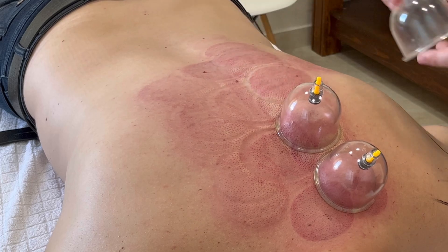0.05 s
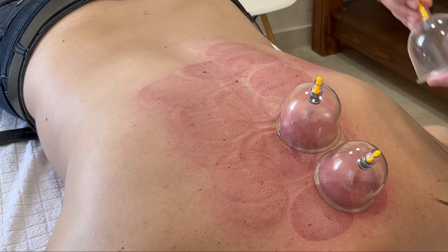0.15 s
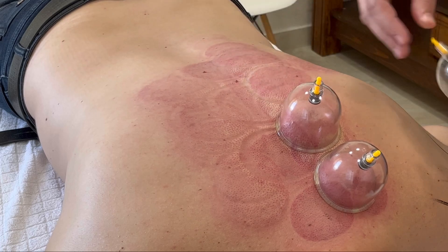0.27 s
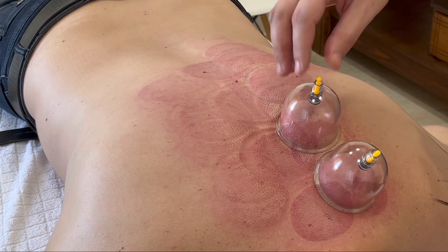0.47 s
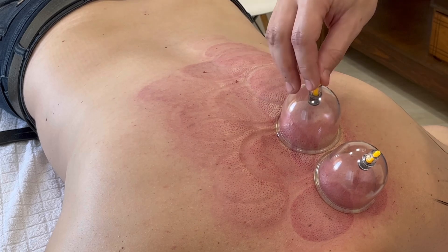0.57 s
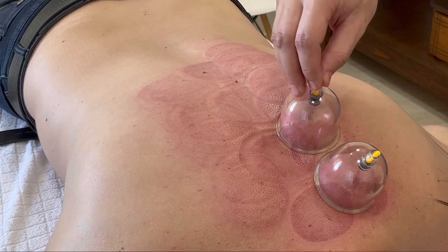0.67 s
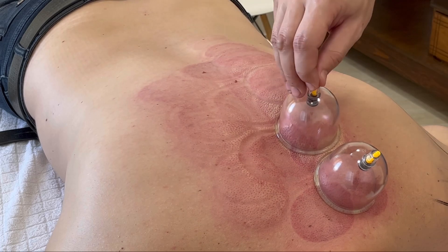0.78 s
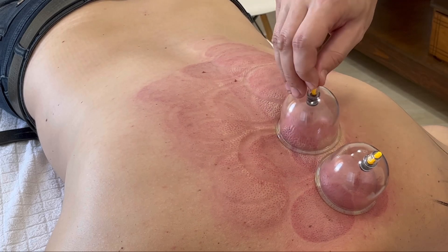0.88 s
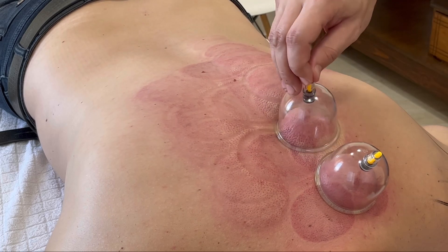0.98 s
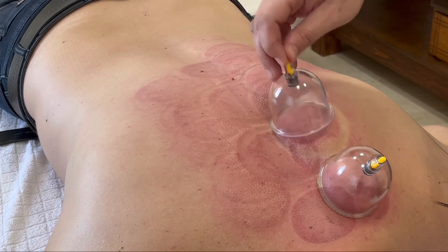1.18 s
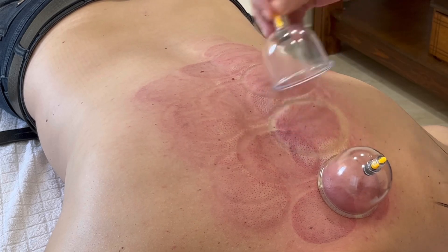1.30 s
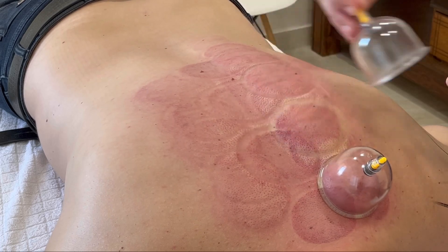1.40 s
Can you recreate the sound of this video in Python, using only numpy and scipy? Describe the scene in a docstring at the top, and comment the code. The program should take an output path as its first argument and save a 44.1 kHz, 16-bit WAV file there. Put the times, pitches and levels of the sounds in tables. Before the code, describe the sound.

A plastic suction cup gives one sharp, hollow pop at about 0.25 seconds, just after a tiny squeak, and rings briefly in a small, hard-walled room. At 0.75 seconds another cup's valve chirps much more quietly, with a short hiss of air and a quick rising note. Light plastic ticks come near 1.1 and 1.4 seconds. A low room rumble and a faint rustle lie underneath.

```python
"""Cupping in a small, hard-walled room.

A freed plastic cup squeaks at the rim and gives one sharp, hollow pop as it is put aside.
Fingers lift the valve of the next cup: it chirps, air hisses in and the cavity's note rises as the
skin sinks back. The cup ticks lightly as it comes off; a low room rumble and a faint rustle lie
underneath."""
import sys
import numpy as np
from scipy import signal
from scipy.fft import rfft, irfft, next_fast_len
from scipy.io import wavfile
from scipy.ndimage import uniform_filter1d

SR = 44100
rng = np.random.default_rng(int(sys.argv[2]) if len(sys.argv) > 2 else 0)


def wrap_up_sound(samples):
    """Save the sound to the file named by the first command line argument, as 16-bit audio."""
    columns = np.atleast_2d(samples).T
    # keep every value between -1 and 1, then stretch to whole-number steps
    tamed = np.clip(columns, -1, 1)
    steps = np.round(tamed * 32767).astype(np.int16)
    wavfile.write(sys.argv[1], SR, steps)


N = 63945


def amp(db):
    """Decibels to gain."""
    return 10 ** (np.asarray(db) / 20)


def unit(x):
    """Scale to rms 1."""
    return x / np.sqrt(np.mean(x ** 2) + 1e-20)


def along(points, hz):
    """Interpolate (f/Hz, value) points on a log axis."""
    f, v = np.transpose(points)
    return np.interp(np.log(hz + 1), np.log(f + 1), v)


def since(s):
    """Seconds since s, zero before."""
    return np.maximum(np.arange(N) / SR - s, 0)


def dying(t, t60):
    """Ring-down starting when t leaves zero."""
    return (t > 0) * np.exp(-np.log(1000) * t / t60)


def swell(s, rise_s, fall_db_per_s):
    """Linear rise, exponential fall."""
    return np.minimum(since(s) / rise_s, 1) * amp(-fall_db_per_s * since(s + rise_s))


def glide(s, from_hz, to_hz, tau_s):
    """Sine whose pitch glides exponentially from time s."""
    pitch_hz = to_hz + (from_hz - to_hz) * np.exp(-since(s) / tau_s)
    return np.sin(2 * np.pi * np.cumsum(pitch_hz) / SR)


def filtered(x, response):
    """Apply a frequency response."""
    size = next_fast_len(N + SR // 2)
    return irfft(rfft(x, size) * response(np.fft.rfftfreq(size, 1 / SR)), size)[..., :N]


def noise(colour):
    """Coloured noise, rms 1."""
    return unit(filtered(rng.standard_normal(N), lambda hz: amp(along(colour, hz))))


def click(s, colour):
    """Minimum-phase coloured click, energy 1."""
    size = 2048
    cepstrum = irfft(np.log(amp(along(colour, np.fft.rfftfreq(size, 1 / SR)))))
    cepstrum[1:size // 2] *= 2
    cepstrum[size // 2 + 1:] = 0
    shape = irfft(np.exp(rfft(cepstrum)))
    return np.pad(shape / np.linalg.norm(shape), (round(s * SR), N))[:N]


# Rim contacts: t/s after POP_S, level/dB
RIM_SNAPS = [(.0002, 4), (.001, 5.5), (.0066, -0.5)]
# Snap spectrum: f/Hz, level/dB
SNAP_SPECTRUM = [(150, -18), (400, -2.5), (630, -14), (950, 9), (1850, 3.5), (2400, 2.5), (2720, -19.5),
                 (3050, 5), (3500, 2.5), (4200, -3), (5500, -7.5), (7500, -2.5), (9800, -2), (11300, -3),
                 (15000, -9.5)]
# Cavity and wall modes: f/Hz, level/dB, t60/s, attack/s
CUP_RESONANCES = [(1202.4, 15, 0.012, 0.0018), (1051, 4, 0.017, 0.0047), (1828, -6, 0.023, 0.0027),
                  (3004, -20, 0.056, 0.00036), (3364, -19, 0.044, 0.00026), (6465, -20.5, 0.044, .0005)]
POP_S, POP_DB, CAVITY_LAG_S = .2492, -16.5, .000886


def pop():
    """The rim snaps, the shell buzzes briefly and the air in the cup rings."""
    snaps = sum(room(amp(db) * click(POP_S + s, SNAP_SPECTRUM), wet_db=-.5) for s, db in RIM_SNAPS)
    t = since(POP_S)
    crack_decay = amp(-12) * dying(t, t60=.0075)
    shell_decay = amp(-17) * dying(t, t60=.11)
    buzz = (crack_decay + shell_decay) * noise(SNAP_SPECTRUM)
    t = since(POP_S + CAVITY_LAG_S)
    ring = 0
    for hz, db, t60, attack_s in CUP_RESONANCES:
        onset = 1 - np.exp(-(t / attack_s) ** 2)
        ring += amp(db) * np.sin(2 * np.pi * hz * t) * dying(t, t60) * onset
    return amp(POP_DB) * (snaps + room(buzz, wet_db=-.5) + room(ring, wet_db=-1.5))


def squeak(start_s=.2184, level_db=-55, roughness=.37):
    """Short, rough, rising rim squeak that swells until the snap."""
    tone = glide(start_s, from_hz=966, to_hz=1660, tau_s=.004)
    flutter = 1 + roughness * unit(uniform_filter1d(rng.standard_normal(N), size=90))
    growth = (since(POP_S) == 0) * since(start_s) / (POP_S - start_s)
    return amp(level_db) * growth * flutter * tone


# Valve chirps: t/s after VALVE_S, length/s, f/Hz, level/dB
VALVE_CHIRPS = [(0, 0.0076, 3026, -42), (.003, 0.0051, 3500, -42), (.008, .007, 2950, -47),
                (0.01, 0.0065, 3560, -44)]
# Inrushing air: f/Hz, level/dB
HISS_SPECTRUM = [(200, -11), (650, -13), (1100, 0), (1450, -7.5), (1820, 1), (2500, -8.5), (3300, 2),
                 (4300, -1), (6100, -6), (6750, -1.5), (7400, -8.5), (9500, -2.5), (11500, 2), (15000, -2),
                 (16000, -6.5)]
VALVE_S, INRUSH_S, NOTE_S = .7455, .751, .755


def valve():
    """The valve chirps, air rushes in and blows a rising note in the cup."""
    chirps = 0
    for s, length_s, hz, db in VALVE_CHIRPS:
        t = since(VALVE_S + s)
        arch = np.sin(np.pi * np.minimum(t / length_s, 1))
        chirps += amp(db) * arch * np.sin(2 * np.pi * hz * t)
    inrush = swell(INRUSH_S, rise_s=.0065, fall_db_per_s=334.5)
    leak = amp(-14) * swell(VALVE_S, rise_s=.0065, fall_db_per_s=67)
    hiss = amp(-44) * (inrush + leak) * noise(HISS_SPECTRUM)
    tone = glide(NOTE_S, from_hz=678, to_hz=1193, tau_s=.01377)
    note = amp(-45.5) * swell(NOTE_S, rise_s=.014, fall_db_per_s=513) * tone
    return room(chirps, wet_db=-6) + room(hiss, wet_db=-1.5) + room(note, wet_db=-13)


# Plastic ticks: t/s, level/dB, ring f/Hz
PLASTIC_TICKS = [(0.1232, -58, 6200), (0.524, -53.5, 9450), (1.0883, -42, 6400), (1.0908, -45.5, 5760),
                 (1.4369, -47.5, 5920)]
# Tick spectrum: f/Hz, level/dB
TICK_SPECTRUM = [(300, -18.5), (2600, -33.5), (3800, -14), (4800, -4), (7000, -5.5), (10000, -8),
                 (15000, -19)]


def ticks(ring_db=15.5, half_width_hz=400):
    """Short scuffs of plastic, each with one broad resonance."""
    out = np.zeros(N)
    for s, db, ring_hz in PLASTIC_TICKS:
        resonance = lambda hz: 1 + amp(ring_db) / (1 + ((hz - ring_hz) / half_width_hz) ** 2)
        scuff = unit(filtered(noise(TICK_SPECTRUM), resonance))
        out += amp(db) * dying(since(s), t60=.015) * scuff
    return out


# Early reflections: delay/s, level/dB
REFLECTIONS = [(.0062, -10.5), (.0098, -10), (0.0132, -14.5), (.058, -19)]
# Tail decay: f/Hz, t60/s
TAIL_T60 = [(200, .5), (1100, 0.91), (2000, 0.9), (3500, 0.77), (6500, 0.76), (11000, 0.5), (15000, 0.34)]
# Tail spectrum: f/Hz, level/dB
TAIL_SPECTRUM = [(300, 0.5), (950, 1.5), (1200, -2), (1500, -6), (1900, 3), (2700, -3), (3200, 0.5),
                 (4200, -1), (6500, 3.5), (11000, -3), (15000, -3)]


def room(x, wet_db, build_s=.0073):
    """Direct sound, near-wall reflections and a stereo tail whose treble dies first."""
    band_hz, t, bands = signal.stft(rng.standard_normal((2, N)), SR, nperseg=256)
    decay = dying(t, along(TAIL_T60, band_hz)[:, None])
    tail = signal.istft(bands * decay, SR, nperseg=256)[1][:, :N]
    tail = spread(tail * (1 - np.exp(-since(0) / build_s)))
    tail = filtered(unit(tail) / np.sqrt(N), lambda hz: amp(along(TAIL_SPECTRUM, hz)))
    walls = lambda hz: 1 + sum(amp(db) * np.exp(-2j * np.pi * hz * s) for s, db in REFLECTIONS)
    return filtered(x, walls) + amp(wet_db) * signal.fftconvolve(x[None], tail, axes=1)[:, :N]


# Stereo width of the reverberation and background: f/Hz, left-right correlation
CORRELATION = [(50, 0.99), (130, 0.98), (260, .78), (500, 0.71), (900, 0.014), (1350, -0.75), (1800, .7),
               (2500, 1), (5100, 1), (5700, 0.66), (7200, 0.3), (8100, 1), (8900, 1), (9800, -1),
               (11300, .99), (13000, .99), (13700, 0.587)]


def spread(pair):
    """Mix two independent signals to left and right with a set correlation per frequency."""
    angle = lambda hz: np.arccos(np.clip(along(CORRELATION, hz), -1, 1)) / 2
    mid, side = filtered(pair, lambda hz: np.array([np.cos(angle(hz)), np.sin(angle(hz))]))
    return np.array([mid + side, mid - side])


# Room rumble and rustle spectra: f/Hz, level/dB
RUMBLE_SPECTRUM = [(20, -17.5), (33, -9), (43, 6), (58, -2.5), (95, -6), (125, -1), (170, -10.5),
                   (280, -14.5), (450, -24.5), (650, -29), (1200, -28.5), (2300, -46.5), (5000, -52),
                   (15000, -54.5)]
RUSTLE_SPECTRUM = [(1000, -29.5), (3500, -16), (5000, -9.5), (5800, 0), (6500, 3), (7100, -18), (7900, -5),
                   (9500, -16.5), (15000, -20.5)]
# Their envelopes: t/s, level/dB
RUMBLE_ENVELOPE = [(0, -57.5), (.12, -58), (0.178, -57.5), (.33, -62.5), (.7, -56), (.95, -56.5),
                   (1.2, -54), (1.3, -56.5), (1.45, -56)]
RUSTLE_ENVELOPE = [(0, -72.5), (.12, -75), (.2, -76), (.7, -92), (1.05, -76), (1.149, -65.5), (1.27, -74.5),
                   (1.45, -84.5)]


def background():
    """Low room rumble and faint rustle: stereo noises of drifting level."""
    out = 0
    for spectrum, envelope in (RUMBLE_SPECTRUM, RUMBLE_ENVELOPE), (RUSTLE_SPECTRUM, RUSTLE_ENVELOPE):
        level_db = np.interp(since(0), *np.transpose(envelope))
        pair = np.array([noise(spectrum), noise(spectrum)])
        out += amp(level_db) * unit(spread(pair))
    return out


def scene():
    """The cups in the room, over the background."""
    return squeak() + pop() + valve() + room(ticks(), wet_db=-9) + background()


# Microphone port phase: f/Hz, left lead/rad
PORT_LEAD = [(300, 0), (800, 0.86), (1250, -1.1), (1850, 0.07), (2600, 0.25), (5100, 0.5), (5700, 0.6),
             (7000, -1.52), (8150, -3), (8800, -2.5), (10000, -4.5), (11100, -8), (13100, -4.5),
             (14500, -9.1)]
# Port balance: f/Hz, left minus right/dB
PORT_TILT = [(100, 0.6), (500, 3), (1100, -0.5), (1900, -6), (3000, 0.5), (12000, -0.5)]


def record(dry, cutoff_hz=15600):
    """Two microphone ports differing in level and phase, then a steep low-pass."""
    half = np.array([[.5], [-.5]])
    gain = lambda hz: amp(half * along(PORT_TILT, hz))
    ports = filtered(dry, lambda hz: gain(hz) * np.exp(1j * half * along(PORT_LEAD, hz)))
    return filtered(ports, lambda hz: 1 / np.sqrt(1 + (hz / cutoff_hz) ** 200))


dry = scene()
out = record(dry)
wrap_up_sound(out)
```